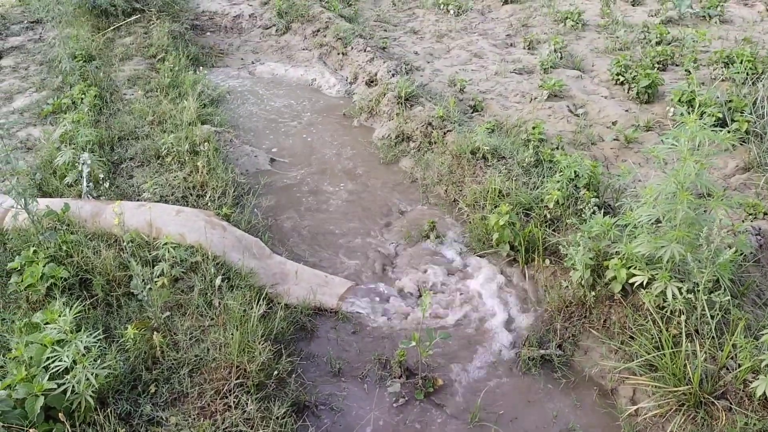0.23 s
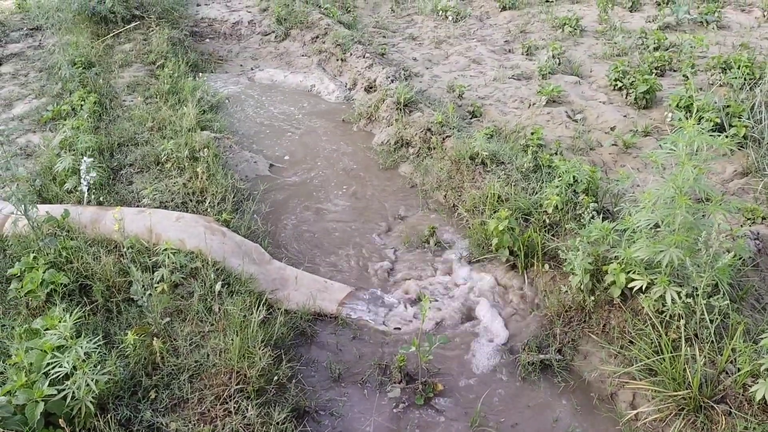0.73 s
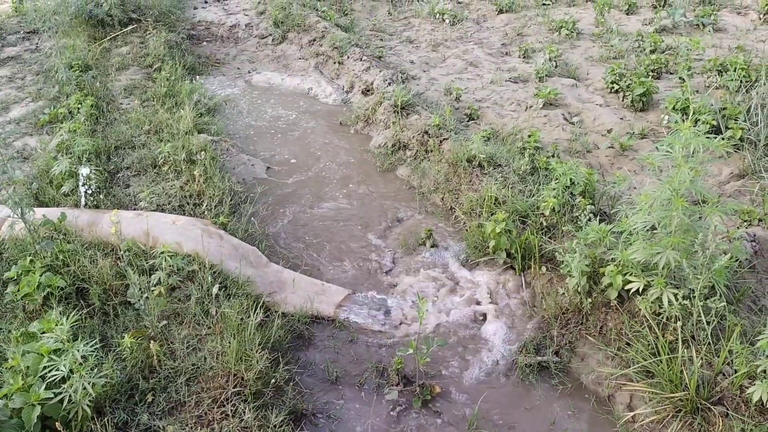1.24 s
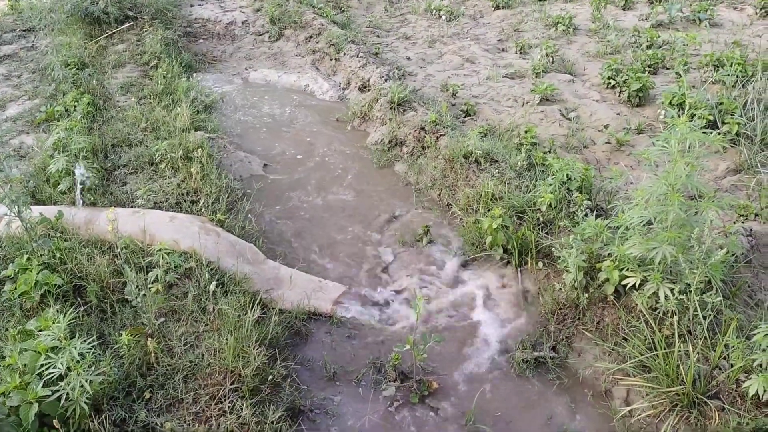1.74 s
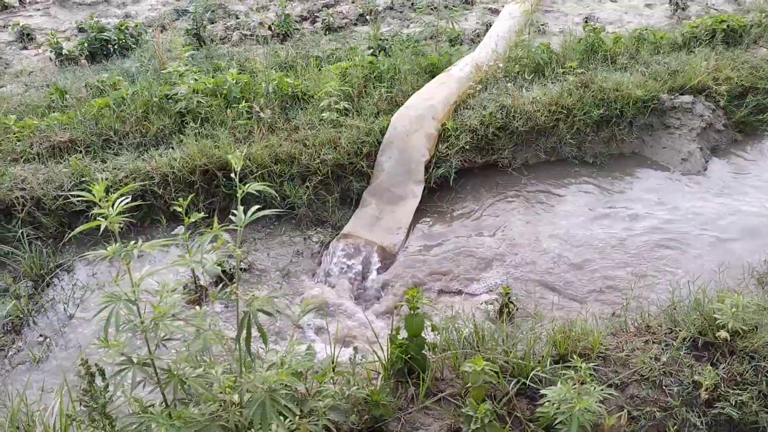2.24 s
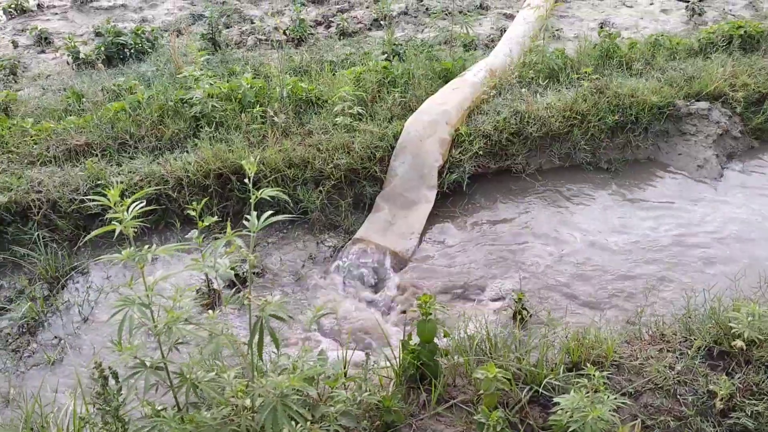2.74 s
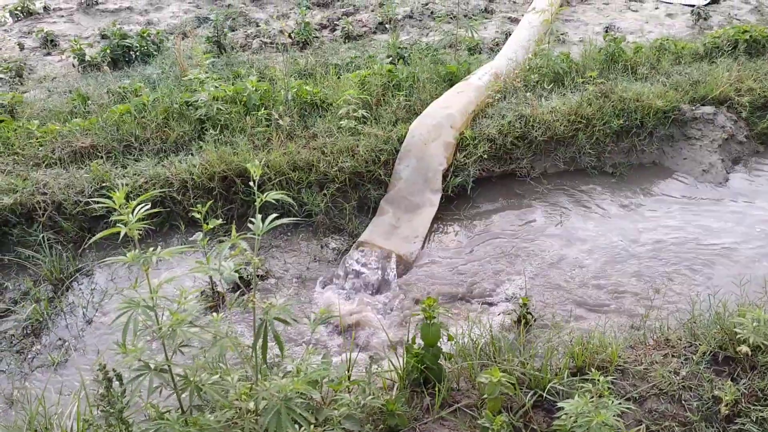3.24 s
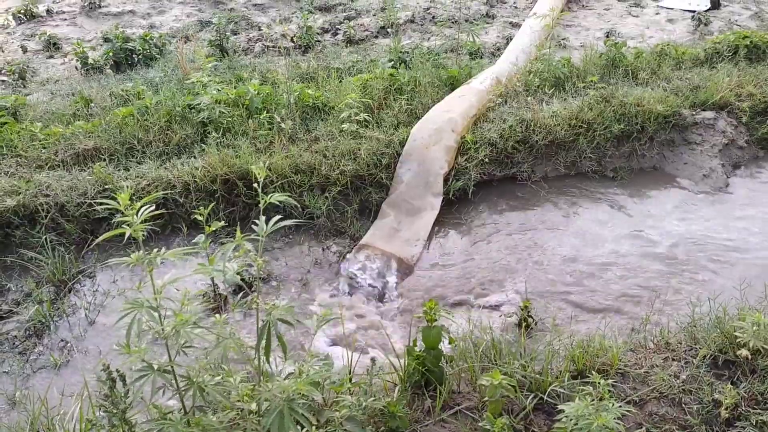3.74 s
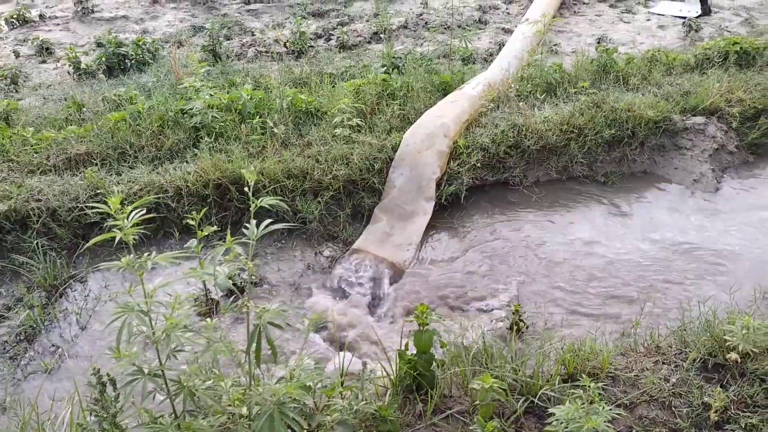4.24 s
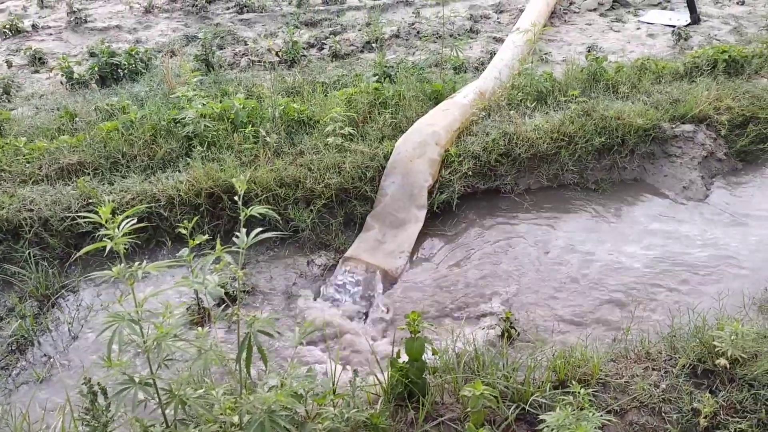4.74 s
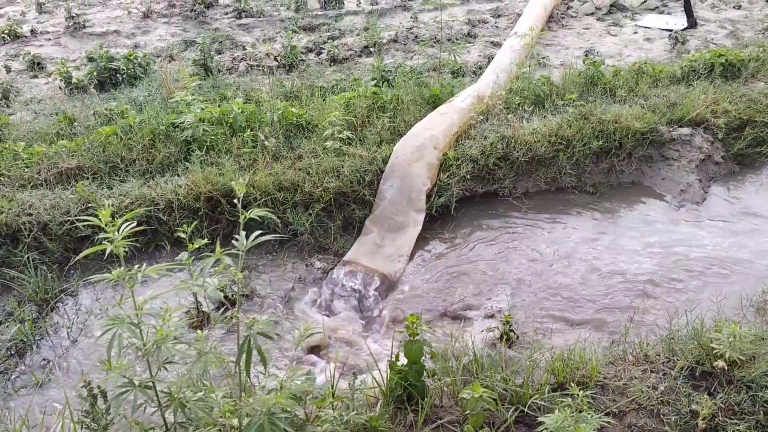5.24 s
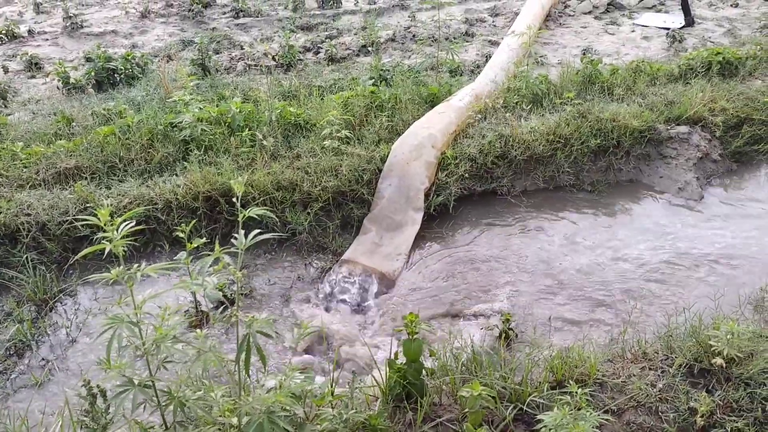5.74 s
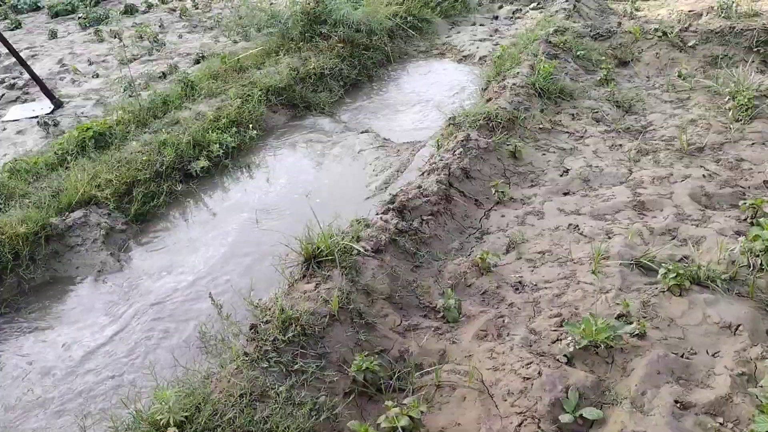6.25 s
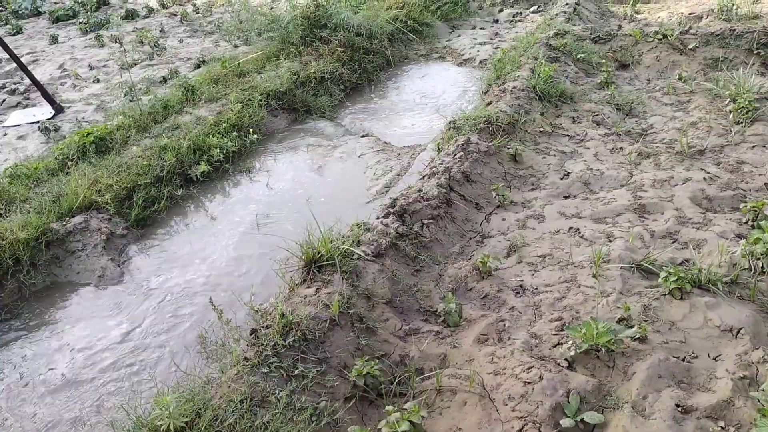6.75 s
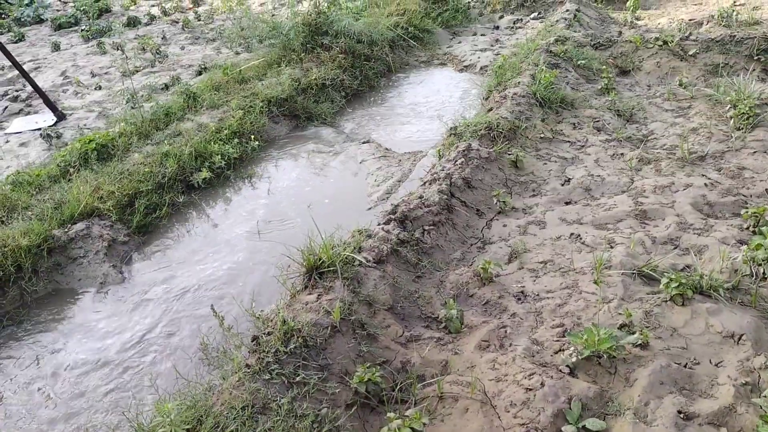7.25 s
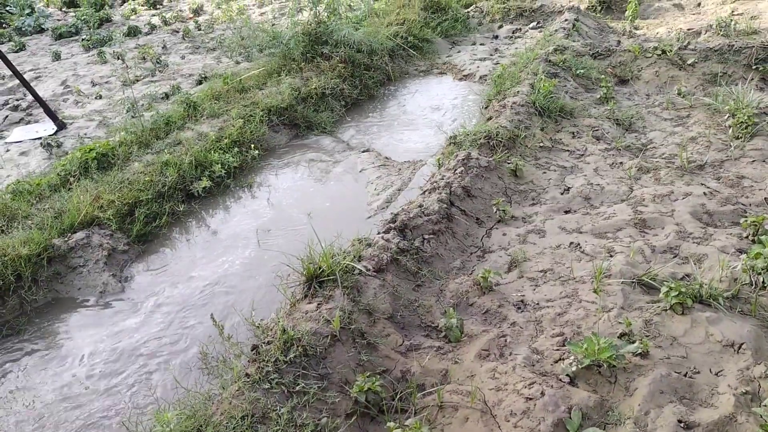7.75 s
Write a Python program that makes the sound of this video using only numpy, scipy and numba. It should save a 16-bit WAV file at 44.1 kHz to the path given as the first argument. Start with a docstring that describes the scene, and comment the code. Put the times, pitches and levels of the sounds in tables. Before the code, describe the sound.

A dense, bubbly rush of water pours into a field ditch while a distant pump engine chugs about eleven times a second.

```python
"""A rough gush of pump water from a plastic hose into a muddy field channel is heard at once, over a
steady thudding engine. We listen from three spots in turn: beside the jet, facing it, down the channel.
The water is swarms of ringing bubbles that surge and flicker, plus splashes, lone bubbles and drops.
The single-cylinder pump engine, some way off, is filtered exhaust pulses, echoes, gas noise and rumble."""
import sys
import numpy as np
from scipy import signal
from scipy.fft import rfft, irfft, next_fast_len
from scipy.io import wavfile
from scipy.ndimage import uniform_filter1d
from numba import njit

SR = 44100
rng = np.random.default_rng(int(sys.argv[2]) if len(sys.argv) > 2 else 0)


def store_wav(level_fs):
    """Save 16-bit WAV to argv[1]."""
    pcm = np.round(np.clip(np.atleast_2d(level_fs), -1, 1) * 32767)
    wavfile.write(sys.argv[1], SR, pcm.T.astype(np.int16))


N = 353231

# the three spots: (start t/s, first firing t/s, firing rate f/Hz, engine level/dB,
# left-right likeness of the bubbles/0-1)
SPOTS = [(0, .0267, 10.944, -1.5, .89), (2.02, 2.026, 11.217, 0, .89), (6.07, 6.0813, 11.228, .5, .81)]
# how strongly the bubbles flicker at each spot: (factor on the flicker in dB)
LUMPINESS = [0.71, 0.94, 1]
# how crowded the bubbles are at each spot: (factor on their number)
DENSITY = [1.2, 1.1, .7]
# the engine's rumble between firings: (f/Hz, level/dB per Hz, before the spot's engine level)
RUMBLE = [(20, -105), (45, -95), (62, -84), (78, -86.5), (105, -71.5), (150, -77), (230, -82.5),
          (320, -102), (600, -120)]
# colour of the water at each spot: (f/Hz, left level/dB per Hz, right level/dB per Hz)
BESIDE_COLOUR = [(265, -79, -88), (374, -75.5, -73), (530, -82, -94), (590, -90, -83.5),
                 (825, -71.5, -70.5), (1180, -67.5, -72), (1596, -82.5, -76), (1850, -63, -73),
                 (2114, -64.5, -69.5), (2280, -80, -87), (2606, -67.5, -77), (2950, -66.5, -79.5),
                 (3200, -84, -97), (3340, -70, -77.5), (3710, -84.5, -92), (4340, -80, -80.5),
                 (4430, -83.5, -77), (4680, -76, -94), (5000, -87.5, -91), (5620, -89, -81),
                 (5960, -89.5, -107), (6520, -77, -89), (6560, -95, -87), (6990, -79.5, -95),
                 (8100, -94.5, -94), (9700, -92, -89.5), (12600, -111.5, -111.5), (13180, -108.0, -107.0),
                 (15290, -112.0, -112.5)]
FACING_COLOUR = [(256, -80.5, -80.5), (360, -79, -82.5), (468, -88, -84.5), (587, -72.5, -69.5),
                 (806, -67, -68), (1092, -67.5, -71), (1250, -82, -74.5), (1485, -74, -70.5),
                 (1730, -78.5, -77), (1950, -69, -89.5), (1990, -90.5, -80.5), (2310, -61, -74.5),
                 (2580, -73.5, -81), (3140, -70.5, -84.5), (3290, -83.5, -78), (3420, -74, -79),
                 (3980, -89.5, -98), (4300, -82, -80), (4960, -85, -90.5), (5970, -91.5, -86),
                 (6200, -85, -96.5), (8000, -88, -90), (8970, -86, -82.5), (9620, -91.5, -94.5),
                 (9900, -92.5, -89), (11170, -104.5, -103.5), (11700, -104.0, -103.0),
                 (12700, -108.5, -106.0), (15100, -110.5, -110.5)]
DOWNSTREAM_COLOUR = [(304, -78.5, -81.5), (467, -78, -84), (554, -95.5, -75.5), (720, -73.5, -73),
                     (1180, -73.5, -79.5), (1270, -100, -85), (1494, -73.5, -75.5), (2250, -78.5, -84.5),
                     (2390, -71.5, -82.5), (4000, -83.5, -85), (5340, -80, -89.5), (5750, -75.5, -86),
                     (6520, -80.5, -90), (7170, -89.5, -95.5), (8700, -101, -87), (10170, -90.5, -91.5),
                     (11500, -103.8, -104.8), (12000, -92, -95), (12850, -95, -96), (13000, -108.4, -109.0),
                     (15160, -109.9, -107.8)]
# how far the left microphone leads the right at each spot: (f/Hz, phase/radians)
BESIDE_LEAD = [(0, 0), (1200, -.2), (1550, -2.4), (1850, -5.8), (2500, -6.8), (3200, -8.6), (4300, -7.9),
               (5200, -9.6), (6400, -12.7), (7500, -16.5), (15000, -31.4)]
FACING_LEAD = [(0, 0), (780, -.1), (1210, -1), (1460, .2), (2150, .2), (3270, -2.5), (5200, -3.5),
               (6800, -9.2), (8000, -11.3), (9800, -12.3), (11500, -18.7), (15000, -18.8)]
DOWNSTREAM_LEAD = [(0, 0), (860, -.7), (1290, -3), (1550, -2.4), (2200, -3.3), (3100, -6.2), (4600, -8.2),
                   (7000, -15.3), (7900, -18.8), (10200, -25.2), (13000, -31.4), (15000, -37)]
# random surges of the jet, one per bubble size (gulping, churning, splashing, spray):
# (f/Hz, typical swing level/dB)
SURGES = [(400, -0.1), (900, -0.03), (2200, -0.6), (7000, 1.5)]
# big bubbles swell as the water gulps air and sink in the lulls: (t/s, length/s, swell level/dB)
GULPS = [(0.165, 0.059, -8), (0.604, 0.17, -6.5), (0.39, 0.15, 9), (0.828, 0.076, 9), (0.987, 0.061, 3),
         (1.193, .14, -7), (1.905, 0.042, 11), (2.07, 0.15, 7.5), (3.396, 0.48, 3.5), (4.4, 0.68, 2),
         (5.374, 0.22, -7.5), (5.65, 0.23, -1), (5.946, 0.11, -11), (6.375, 0.35, 3.5), (6.59, 0.15, -11.5),
         (7.25, .07, 4.5), (7.382, 0.1, 11.5), (7.798, 0.081, -9)]
# churning under the jet, which drops away down the channel: (t/s, middle-range level/dB)
CHURN = [(0, 0), (.55, 3.5), (.85, -3.5), (1.25, -0.5), (1.8, 4), (2.0, -0.5), (2.4, 1), (2.75, 0),
         (3.3, 1), (5.6, 0), (6.15, 0.5), (6.5, -8.5), (7.2, -11.5), (8.0, -9.5)]
# slow rise and fall of the spray: (t/s, treble level/dB; the bubbles take a share of it)
SPRAY = [(0, 1.5), (0.45, -0.5), (1.0, 2), (1.4, -2), (2.0, 3), (2.6, -1.5), (3.6, -2.5), (4.3, 1),
         (5.0, 0.5), (5.35, -3.5), (6.15, 3.5), (6.65, 9.5), (6.85, 5.5), (7.15, 13.5), (7.7, 5.5),
         (8.0, 0.5)]
# flurries of bubbles as the jet breaks up, and lulls: (t/s, length/s, swell level/dB, centre f/Hz)
FLURRIES = [(.3, 1, 6.5, 3090), (1.106, 0.16, -5, 3090), (1.23, 0.12, 7, 2900), (1.898, 0.19, 7, 2220),
            (2.573, 0.18, 10, 3030), (3.12, 0.38, 9.5, 3060), (3.3, 0.18, -10, 2100),
            (3.79, 0.2, 13.5, 3090), (4.12, 0.077, 0, 1900), (4.265, 0.39, 11, 2770),
            (4.868, 0.04, 11, 2500), (5.12, 0.07, 14, 3120), (5.843, 0.057, -20, 2060),
            (6.157, 0.13, 3.5, 3090), (6.17, 0.18, 4, 1900), (6.2, 0.099, 5.5, 2420),
            (6.48, 0.036, -6, 3080), (6.583, 0.065, -18, 1900), (6.676, 0.074, -8, 1180),
            (6.797, 0.059, 4, 1900), (7.04, 0.2, 9, 2270), (7.205, 0.072, -14.5, 1920),
            (7.355, 0.038, 0, 1890), (7.655, 0.18, 5, 2100), (7.78, .04, -21, 1900),
            (7.852, 0.099, 8, 1900)]
# slaps of water and pattering spray: (t/s, peak level/dB, centre f/Hz)
SPLASHES = [(0.1052, -44.5, 3860), (0.256, -28, 5500), (0.288, -29, 3760), (0.4158, -29, 1860),
            (0.689, -37, 5470), (0.8333, -33, 4540), (0.925, -33.5, 4400), (1.0157, -30, 3680),
            (1.0293, -27, 2250), (1.177, -28, 2460), (1.197, -37, 3300), (1.214, -23, 3350),
            (1.222, -30, 2060), (1.3828, -51, 4000), (1.476, -37, 4300), (1.505, -35, 3700),
            (1.566, -38, 3720), (1.6576, -35.5, 3940), (1.682, -48, 3940), (1.7492, -27, 3680),
            (1.8715, -30.5, 4200), (1.9343, -31, 3970), (2.7831, -28, 1560), (3.2354, -30.5, 1174),
            (3.309, -37, 5200), (3.7727, -33, 3120), (4.018, -31.5, 786), (4.8564, -27.5, 2480),
            (5.046, -34, 4440), (5.103, -27, 3230), (5.402, -37, 4400), (5.875, -31, 2370),
            (5.9184, -24.5, 2140), (6.0176, -29, 2010), (6.176, -32, 4440), (7.0853, -32.5, 4200),
            (7.201, -34.5, 4540), (7.5743, -35, 1770), (7.6651, -32, 2660), (7.8, -42.5, 3300)]
# single bubbles that ring out of the gush: (t/s, peak level/dB, pitch f/Hz, ring/cycles)
PLOPS = [(0.388, -29.5, 615, 6.7), (0.549, -30, 875, 18), (1.704, -26.5, 787, 16), (1.799, -28, 1040, 19),
         (2.059, -32, 315, 5.2), (2.1003, -41, 323, 7.8), (2.152, -31, 810, 14), (2.1618, -38.5, 362, 11),
         (2.436, -26.5, 880, 22), (2.566, -29, 674, 10), (3.233, -31, 1014, 18), (3.418, -37, 425, 18),
         (4.419, -29, 744, 11), (4.548, -37.5, 457, 10), (4.693, -30.5, 640, 10), (4.766, -28.5, 800, 17),
         (6.258, -41, 940, 35), (6.539, -42.5, 946, 76), (6.69, -37.5, 880, 20), (6.723, -38.5, 740, 15),
         (6.76, -38, 720, 15), (7.105, -30, 807, 15), (7.1417, -37, 800, 9.6), (7.532, -34.5, 940, 40),
         (7.953, -41, 920, 18), (0.336, -29.5, 2854, 39), (1.281, -30, 2730, 40), (2.6184, -37, 3280, 40),
         (3.7472, -29.5, 3070, 45), (3.789, -26.5, 3200, 39), (4.2093, -28, 1470, 40),
         (4.249, -33, 1510, 45), (4.364, -28, 2390, 71), (4.8727, -44, 2380, 37), (5.262, -32.5, 1460, 21),
         (7.132, -36.5, 2580, 83), (7.732, -38, 2540, 70), (7.831, -37, 2570, 62)]
# flung drops that tick on the pool: (t/s, peak level/dB, trapped bubble f/Hz, ring over impact level/dB)
TICKS = [(0.4359, -33, 5700, -12), (1.1775, -31.5, 5640, -16), (1.9764, -32.5, 7500, 4),
         (2.2079, -27, 9000, -2), (2.5097, -43, 8570, -8), (2.7561, -31, 6140, -2),
         (3.1622, -46, 8590, -28), (3.7055, -34, 8700, 0), (3.8237, -33, 9300, 0), (4.115, -33, 9180, 0),
         (4.2822, -26, 8500, -10), (4.9372, -36, 8660, 4), (5.0275, -30, 8950, 1), (5.7927, -30, 9050, 1),
         (5.9404, -38, 8450, -14), (6.0132, -31, 9700, 8), (6.1765, -29, 5450, -9),
         (6.5181, -31, 5900, -20), (6.7306, -33.5, 5540, -22), (7.1995, -28, 5800, -11),
         (7.7029, -38, 6000, -4), (7.7618, -29.5, 5970, -19)]


def undb(db):
    """Turn decibels into a gain."""
    return 10 ** (np.asarray(db) / 20)


def on_log(hz, points_hz, values):
    """Read values between points on a log-frequency axis."""
    return np.interp(np.log(hz + 1e-9), np.log(points_hz), values)


def bins(size):
    """Frequencies in the spectrum of a sound of this many samples."""
    return np.fft.rfftfreq(size, 1 / SR)


def walk(rate, size):
    """Random levels that glide to a new value rate times a second; their spread is 1."""
    hold = max(int(SR / rate), 2)
    steps = np.repeat(rng.standard_normal(4096), hold)[:size]
    smooth = uniform_filter1d(steps, hold)
    return smooth / smooth.std()


def hump(t, s, length):
    """A smooth swell of height 1 around s seconds, length wide at half height."""
    return np.exp2(-np.minimum((2 * (t - s) / length) ** 2, 20))


def add(out, x, s):
    """Mix x into out from s seconds on."""
    i = int(s * SR)
    x = x[:, max(-i, 0):out.shape[1] - i]
    out[:, max(i, 0):max(i, 0) + x.shape[1]] += x


def puffs(first_s, rate, silencer):
    """Turbulent exhaust gas: noise that swells around each firing, so no two chugs are alike."""
    level_db, length_s, lag_s = -51.5, 0.022, 0.0011
    cycle = (np.arange(N) / SR - first_s) * rate
    since_firing = ((cycle + .5) % 1 - .5) / rate
    gas = signal.sosfilt(silencer, rng.standard_normal(N))
    return undb(level_db) * hump(since_firing, lag_s, length_s) * gas / gas.std()


def rumble():
    """Noise scattered by the fields, shaped to the rumble table and nearly alike on both sides."""
    size = next_fast_len(N)
    noise = rfft(rng.standard_normal((2, size))) * np.sqrt(SR / 2)
    shape = undb(on_log(bins(size), *np.transpose(RUMBLE)))
    mid, side = irfft(noise * shape, size)[:, :N]
    return mid + undb(-16) * side * np.array([[1], [-1]])


def engine(first_s, rate):
    """Each firing sends a pulse through the silencer; the bank echoes it and the fields scatter it."""
    thud_db, jitter_s = -39.0, 0.00093
    bank_s, bank_db = 0.0137, -14  # echo delay and level against the direct pulse
    silencer = signal.butter(4, [86, 208], "bandpass", fs=SR, output="sos")
    t = np.arange(4096) / SR
    direct = signal.sosfilt(silencer, signal.unit_impulse(len(t)))
    bank = undb(bank_db) * np.interp(t - bank_s, t, direct, left=0)
    # a faint noisy tail builds up fast and dies away
    tail_shape = (1 - np.exp(-t / 0.00096)) * np.exp(-t / 0.082)
    tail_noise = undb(-39) / 2 * rng.standard_normal(len(t))
    tail = signal.sosfilt(silencer, tail_noise * tail_shape)
    firings = np.arange(first_s, N / SR, 1 / rate)
    firings = firings + jitter_s * (2 * rng.random(len(firings)) - 1)
    # pulse, bank echo and tail each waver by -0.5 to 1.5 times these dB
    waver_db = [[1.5], [6], [4]] * (2 * rng.random((3, len(firings))) - 0.5)
    # start early enough for the pulse's peak to fall on the firing
    starts = np.maximum((firings * SR).astype(int) - direct.argmax(), 0)
    pulses = np.zeros((3, N))
    pulses[:, starts] = undb(waver_db)
    thuds = signal.oaconvolve(pulses, np.array([direct, bank, tail]), axes=1).sum(axis=0)[:N]
    thuds = thuds / direct.max() * undb(thud_db)
    return thuds + puffs(first_s, rate, silencer) + rumble()


@njit
def ring(size, start, hz, cycles, gain, turn, glide):
    """Bubbles as fading sines that rise in pitch; the right channel hears each turned in phase."""
    out = np.zeros((2, size))
    for k in range(len(start)):
        life = int(cycles[k] * SR / hz[k]) + 2
        step = 2 * np.pi * hz[k] / SR
        # each sample turns and shrinks z; the turn itself grows by the share glide over the life
        pole, rise = np.exp(1j * step - 5.5 / life), np.exp(1j * step * glide / life)
        z, right = gain[k] + 0j, np.exp(1j * turn[k])
        for i in range(start[k], min(start[k] + life, size)):
            out[0, i] += z.imag
            out[1, i] += (z * right).imag
            z *= pole
            pole *= rise
    return out


def swarm(size, likeness, density, count, cycles, big_db, small_db, glide):
    """Spectrum of density * count bubbles a second, levelled to a flat 0 dB per Hz."""
    total = int(density * count * size / SR)
    when, pitch, damping, strength = rng.random((total, 4)).T
    # small, high bubbles are the most numerous in each octave
    hz = (np.sqrt(130) + pitch * (np.sqrt(15500) - np.sqrt(130))) ** 2
    # most bubbles are faint and a few loud
    scatter_db = on_log(hz, [1500, 8000], [big_db, small_db])
    chance = np.minimum(-np.log(1 - strength), 4.5)
    typical_chance = np.quantile(chance, np.linspace(0, 1, 16))
    mean_power = np.mean(undb(scatter_db[:, None] * typical_chance) ** 2, axis=1)
    gain = hz ** (3 / 4) * undb(scatter_db * chance) / np.sqrt(mean_power)
    gain = gain * rng.choice([-1, 1], total)
    # they burst all over the pool, so the highs reach the two microphones out of step
    turn_spread = np.sqrt(-2 * np.log(likeness)) * (np.minimum(hz, 6000) / 1000) ** .33
    turn = turn_spread * rng.standard_normal(total)
    start = (when * size).astype(np.int64)
    spectrum = rfft(ring(size, start, hz, cycles * (.5 + damping), gain, turn, float(glide)))
    power = uniform_filter1d(np.mean(np.abs(spectrum) ** 2, axis=0), size=size // 80)
    return spectrum * np.sqrt(size * SR / 2 / power)


def surging(t):
    """Swells of the jet: each a course in dB and (f/Hz, share of it that such bubbles take)."""
    surges_per_s = 6.93
    reach = 1.24  # a flurry fades out at this pitch ratio to either side
    class_hz, swing_db = np.transpose(SURGES)
    swells = []
    for db, share in zip(swing_db, np.eye(len(SURGES))):
        swells.append((db * walk(surges_per_s, len(t)), list(zip(class_hz, share))))
    for s, length, db, hz in FLURRIES:
        swells.append((db * hump(t, s, length), [(hz / reach, 0), (hz, 1), (hz * reach, 0)]))
    gulps = sum(db * hump(t, s, length) for s, length, db in GULPS)
    churn = np.interp(t, *np.transpose(CHURN))
    spray = np.interp(t, *np.transpose(SPRAY))
    swells.append((gulps, [(520, 1), (790, 0)]))
    swells.append((churn, [(400, 0), (700, 1), (1200, 0.55), (2000, 0.0), (4000, 0.64)]))
    swells.append((spray, [(2500, 0.024), (5000, 0.77)]))
    return swells


def gush(size, swells, likeness, lumpiness, density):
    """Lone ringing bubbles and a boil of damped ones over a dense fizz, surging in bands of pitch."""
    flicker_rate, spatter_rate = 55, 55  # new random levels a second
    trickle = swarm(size, likeness, density, count=700, cycles=162, big_db=2.5, small_db=3.0, glide=0.062)
    boil = swarm(size, likeness, density, count=3400, cycles=34.4, big_db=2.0, small_db=4.0, glide=0.16)
    fizz = swarm(size, likeness, density, count=12000, cycles=6.2, big_db=3.0, small_db=0.5, glide=0.042)
    # the finest spray is mostly fizz, with fewer lone rings
    fine = on_log(bins(size), [3300, 6000], [0, 1])
    spectrum = undb(-7.5 - 2.2 * fine) * trickle + undb(-5.5 - 2 * fine) * boil
    spectrum = spectrum + undb(-8 + 2.76 * fine) * fizz
    centres = np.geomspace(220, 13000, 18)
    spatter, neighbour, out = walk(spatter_rate, size), walk(flicker_rate, size), 0
    for hz, band in zip(centres, np.eye(len(centres))):
        own = walk(flicker_rate, size)
        # neighbouring bands share half of their flicker
        depth_db = lumpiness * on_log(hz, [400, 1200, 5000], [4.0, 1.46, 2.5])
        flicker_db = depth_db * (own + neighbour) / np.sqrt(2)
        surge_db = 0
        for course, reach in swells:
            share = on_log(hz, *np.transpose(reach))
            if share:
                surge_db = surge_db + share * course
        # falling spray lifts all the small bubbles at once
        spatter_db = on_log(hz, [1500, 5000], [.4, 1.82]) * spatter
        swell = undb(surge_db + flicker_db + spatter_db)
        bubbles = irfft(spectrum * on_log(bins(size), centres, band), size)
        # swelling leaves the band's overall level alone
        out = out + bubbles * swell / np.sqrt(np.mean(swell ** 2))
        neighbour = own
    return out


def strays(size, count, low_hz, high_hz, db, scatter_db, cycles, glide):
    """Count lone drops or bubbles a second, ringing anywhere between two pitches."""
    when, pitch, side, strength = rng.random((count * size // SR, 4)).T
    hz = low_hz * (high_hz / low_hz) ** pitch
    gain = undb(db + scatter_db * np.minimum(-np.log(1 - strength), 3))
    start = (when * size).astype(np.int64)
    return ring(size, start, hz, np.full(len(hz), float(cycles)), gain, 2 * side - 1, float(glide))


def burst(hz, count, spread, scatter_s, cycles, glide, size=4096):
    """A knot of bubbles near one pitch, born close together from an eighth into the buffer on."""
    pitch, side, gain = rng.standard_normal((count, 3)).T
    delay = np.abs(scatter_s) * SR * rng.exponential(size=count)
    start = size // 8 + delay.astype(np.int64)
    pitches = np.clip(hz * np.exp(spread * pitch), 200, 15000)
    lengths = np.full(count, float(cycles))
    return ring(size, start, pitches, lengths, gain + np.sign(gain), .5 * side, float(glide))


def splash(hz):
    """A slap of water: thirty bubbles born within a few milliseconds around one pitch."""
    return burst(hz, count=30, spread=0.255, scatter_s=0.0024, cycles=33, glide=0.037)


def plop(hz, cycles):
    """One bubble that pinches off, swells quickly and rings out with a rising pitch."""
    sound = burst(hz, count=1, spread=0, scatter_s=0, cycles=cycles, glide=0.035)
    age = np.maximum(np.arange(sound.shape[1]) - sound.shape[1] // 8, 0) / SR
    return sound * (1 - np.exp(-age * hz / 0.45))  # swells over 0.45 of a cycle


def tick(hz, ring_db):
    """A drop: the broad crackle of its impact with the ping of the tiny bubble it traps."""
    impact = burst(11000, count=14, spread=0.26, scatter_s=0.00046, cycles=8.1, glide=0)
    ping = plop(hz, cycles=54)
    return impact / np.abs(impact).max() + undb(ring_db) * ping / np.abs(ping).max()


def heard(x, colour, lead):
    """Water as it reaches the two microphones, each with its own colour and phase lead."""
    hz = bins(x.shape[1])
    points_hz, left_db, right_db = np.transpose(colour)
    turn = np.exp(.5j * np.interp(hz, *np.transpose(lead)))  # half the lead to each side
    left = undb(on_log(hz, points_hz, left_db)) * turn
    right = undb(on_log(hz, points_hz, right_db)) / turn
    bass_cut = hz ** 4 / np.hypot(hz ** 4, 230. ** 4)
    return irfft(rfft(x) * np.array([left, right]) * bass_cut, x.shape[1])


def water(start, end, likeness, lumpiness, density, colour, lead):
    """The gush and stray drops with the loudest splashes, bubbles and ticks, from one spot."""
    size = next_fast_len(int((end - start) * SR) + 1024)
    out = np.zeros((2, N))
    flow = gush(size, surging(start + np.arange(size) / SR), likeness, lumpiness, density)
    # faint drops, gurgling bubbles and a patter of small ones, over a gush of 0 dB per Hz
    flow = flow + strays(size, count=6, low_hz=8450, high_hz=13000,
                         db=50, scatter_db=-4, cycles=3.4, glide=0)
    flow = flow + strays(size, count=45, low_hz=654.6, high_hz=3650,
                         db=31, scatter_db=1.5, cycles=35, glide=0.11)
    flow = flow + strays(size, count=40, low_hz=3435, high_hz=9560,
                         db=37.5, scatter_db=3.5, cycles=66, glide=.08)
    add(out, heard(flow, colour, lead), start)
    knots = [(s, db, splash(hz)) for s, db, hz in SPLASHES if start <= s < end]
    knots += [(s, db, plop(hz, cycles)) for s, db, hz, cycles in PLOPS if start <= s < end]
    knots += [(s, db, tick(hz, ring_db)) for s, db, hz, ring_db in TICKS if start <= s < end]
    for s, db, knot in knots:
        sound = heard(knot, colour, lead)
        peak = np.abs(sound.mean(axis=0)).max()  # of the two channels averaged
        add(out, sound * undb(db) / peak, s - knot.shape[1] / 8 / SR)
    return out


def scene():
    """Engine and water from each spot in turn, with a very short crossfade between spots."""
    t, out = np.arange(N) / SR, 0
    ends = [spot[0] for spot in SPOTS[1:]] + [N / SR]
    colours = [BESIDE_COLOUR, FACING_COLOUR, DOWNSTREAM_COLOUR]
    leads = [BESIDE_LEAD, FACING_LEAD, DOWNSTREAM_LEAD]
    views = zip(SPOTS, ends, LUMPINESS, DENSITY, colours, leads)
    for (start, first_s, rate, engine_db, likeness), end, lumpiness, density, colour, lead in views:
        here = uniform_filter1d(((t >= start) & (t < end)) * 1., size=128)
        jet = water(start, end, likeness, lumpiness, density, colour, lead)
        out = out + here * (jet + undb(engine_db) * engine(first_s, rate))
    return out


def record(dry):
    """A steep low-pass filter takes away everything above about 15600 Hz."""
    return signal.sosfilt(signal.ellip(10, .2, 70, 15600, fs=SR, output="sos"), dry)


dry = scene()
out = record(dry)
store_wav(out)
```